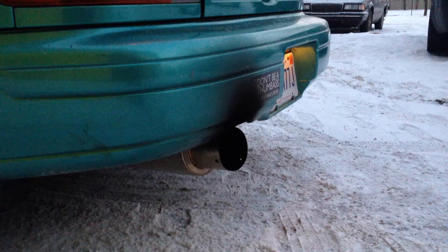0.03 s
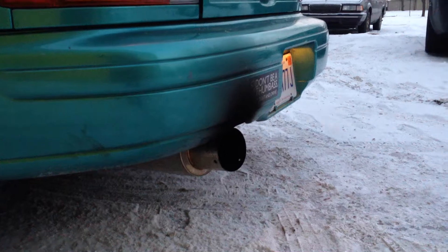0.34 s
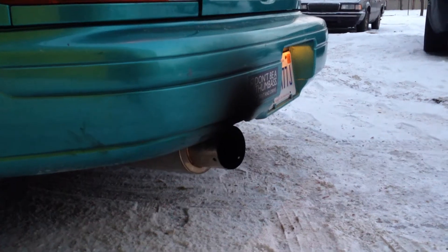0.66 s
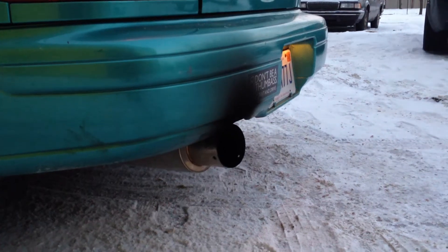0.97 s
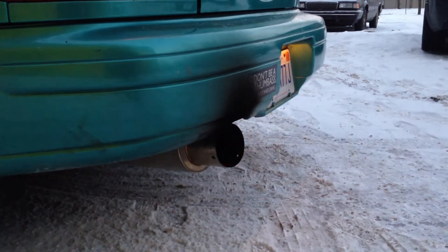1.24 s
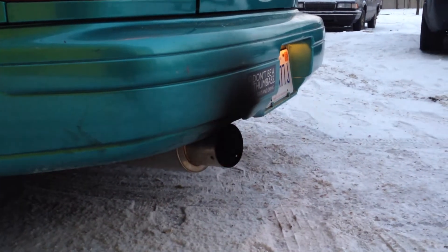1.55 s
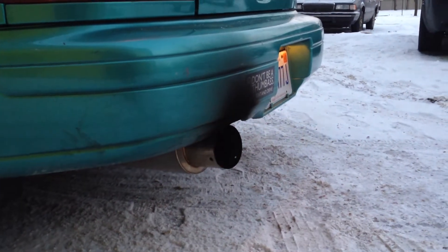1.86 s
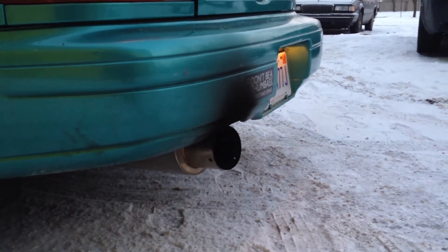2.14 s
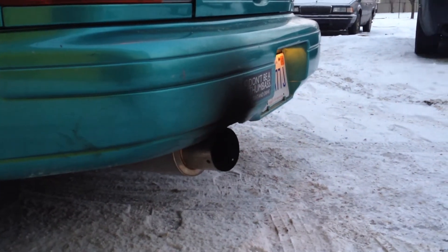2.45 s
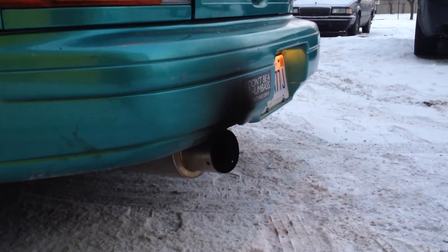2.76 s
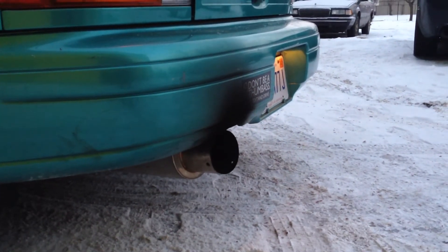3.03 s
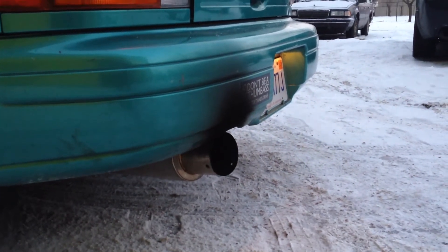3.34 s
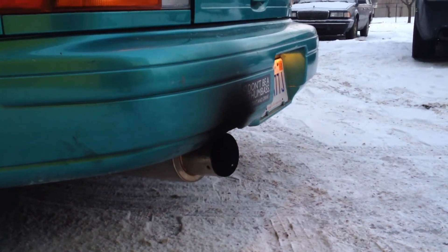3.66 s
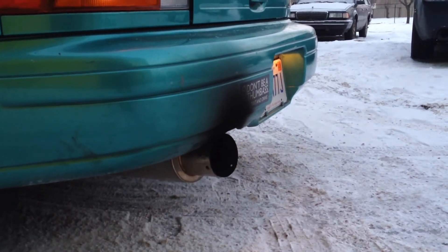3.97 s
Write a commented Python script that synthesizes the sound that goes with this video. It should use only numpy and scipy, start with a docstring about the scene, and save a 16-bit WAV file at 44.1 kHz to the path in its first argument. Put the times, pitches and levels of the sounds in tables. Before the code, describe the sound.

A car exhaust rumbles at a loping idle, with the microphone outside near the pipe. Early on it gives a single small pop and sputters briefly, then keeps thumping along, with a few deep thuds underneath.

```python
"""A four-cylinder car idles unevenly outdoors, heard close to its wide tailpipe.
Each firing is a pressure pulse: a low thump that reflects in the pipe, a knock in the pipe's resonant
modes, and a puff, rasp and hiss of turbulent gas. The engine drones behind; thin metal rings faintly.
One small backfire pops; the level ducks briefly, as under a limiter, and returns; sputters follow.
The loudest thumps just overload the microphone. A few deep thuds sound, as from an overloaded recorder."""
import sys
import numpy as np
from scipy import signal
from scipy.fft import rfft, irfft
from scipy.io import wavfile
from scipy.ndimage import uniform_filter1d

SR = 44100
rng = np.random.default_rng(int(sys.argv[2]) if len(sys.argv) > 2 else 0)


def unload_audio(sound):
    """Save the sound as a 16-bit wav file, at the path given as the first command line argument."""
    columns = np.transpose(np.atleast_2d(sound))
    # keep every value between -1 and 1, then stretch to whole-number steps
    steps = np.round(np.clip(columns, -1, 1) * 32767)
    wavfile.write(sys.argv[1], SR, steps.astype(np.int16))


N = 176400
TIME = np.arange(N) / SR


def from_db(db):
    """Amplitude ratio of a level in decibels."""
    return 10 ** (np.asarray(db) / 20)


def unit_rms(x):
    """Normalisation to unit mean power."""
    return x / np.sqrt(np.mean(x ** 2) + 1e-20)


def noise(spectrum):
    """Spectral shaping: white noise takes on a colour, at unit power."""
    hz, db = np.transpose(spectrum)
    bin_hz = np.maximum(np.arange(N // 2 + 1) * SR / N, 1)
    gain = from_db(np.interp(np.log(bin_hz), np.log(hz), db))
    low_cut = np.minimum(bin_hz / hz[0], 1) ** 2
    return unit_rms(irfft(rfft(rng.standard_normal(N)) * gain * low_cut, N))


def flutter(depth_db):
    """Turbulence: random amplitude modulation with a grain of about a millisecond."""
    eddies = unit_rms(uniform_filter1d(rng.standard_normal(N), size=50))
    return unit_rms(from_db(depth_db * eddies))


def resonator(x, hz, t60):
    """Damped oscillator: a unit impulse excites a decaying sine of height 1."""
    r, w = from_db(-60 / (t60 * SR)), 2 * np.pi * hz / SR
    return signal.lfilter([0, np.sin(w)], [1, -2 * r * np.cos(w), r * r], x + 1e-18)


def impulses(times, db):
    """Impulse train with the given times and levels."""
    samples = np.clip(np.asarray(times) * SR, 0, N).astype(int)
    return np.bincount(samples, from_db(db), N + 1)[:N]


def delayed(x, delay_s):
    """Propagation delay."""
    return np.interp(TIME - delay_s, TIME, x, left=0)


def envelope(x, attack_s, decay_s):
    """Convolution gives each impulse a quick rise and an exponential decay."""
    t = TIME[:SR // 5]
    shape = (1 - np.exp(-(t / attack_s) ** 2)) * np.exp(-t / decay_s)
    return signal.fftconvolve(x, shape / shape.max())[:N]


def wave_packet(x, hz, width_s):
    """Each impulse becomes a pressure oscillation that swells and dies around it."""
    t = np.arange(-(SR // 20), SR // 20 + 1) / SR
    return signal.fftconvolve(x, np.sin(2 * np.pi * hz * t) / np.cosh(t / width_s), "same")


# Crankshaft speed (time [s], speed [rpm])
CRANK_SPEED = [(0.1, 1144.8), (0.5, 1179.0), (1.0, 1162.2), (1.35, 1181.4), (1.8, 1227.3), (2.05, 1172.1),
               (2.3, 1179.2), (2.5, 1200.8), (2.9, 1210.6), (3.15, 1192.3), (3.4, 1170.0), (3.7, 1183.6),
               (3.9, 1220.2)]
def crank_cycles():
    """Phase is the integral of speed; a four-stroke cycle takes two turns."""
    rpm = np.interp(TIME, *np.transpose(CRANK_SPEED))
    cycles = np.cumsum(rpm) / (120 * SR)
    return cycles - np.interp(.1407, TIME, cycles)  # zero phase at 0.1407 s


# Spectrum of the running engine (frequency [Hz], relative level [dB])
DRONE_SPECTRUM = [(20, 8.5), (45, 17.5), (150, 35.5), (300, 17.5), (600, -12), (1000, -5), (2000, -6),
                  (2800, -16.5), (5500, -16), (6600, -21.5), (10000, -26.5), (15000, -38)]
def engine_drone():
    """Stationary broadband noise, strongest in the bass."""
    return from_db(-27) * noise(DRONE_SPECTRUM)


# Modes of thin metal (frequency [Hz], level [dB], reverberation time T60 [s])
METAL_MODES = [(3856, -60.5, .06), (4590, -73, .02), (5450, -64, .012), (8070, -80, .12), (8633, -81, .12),
               (9412, -81, .15)]
def metal_ringing(cycles):
    """Forced vibration: noise drives narrow modes, whose sound swells once a cycle."""
    modes = sum(from_db(db) * unit_rms(resonator(rng.standard_normal(N), hz, t60))
                for hz, db, t60 in METAL_MODES)
    phase = 2 * np.pi * (cycles - 280 / 720)  # loudest at 280 degrees
    return modes * from_db(5 * (np.cos(phase) - 1))


# The level ducks briefly after the pop, as under a limiter, and returns (time [s], level [dB])
LEVEL_DUCK = [(.14, -1.5), (.4, 1.5), (.92, 0.5), (.975, -7), (1.03, -6.5), (1.08, -4.5), (1.122, 0),
              (1.16, -1), (1.21, 0.5), (3.9, 0.5)]
# Cylinders, with relative levels (crank angle [deg], thump [dB], thump frequency [Hz], thump width [s],
# knock [dB], puff [dB], rasp [dB], hiss [dB])
CYLINDERS = [(11.4, -1.71, 145.06, 0.0057, -6.5, -5.5, 0.5, -1), (198.8, -15, 82.9, 0.007, 2, 2.5, -5, -2),
             (381.76, 1.03, 135.4, 0.0043, -4.5, 0, -4, -1.5),
             (586.94, -4, 134.5, 0.0058, -23, -18.5, -21.5, -19.5)]
def firings(cycles, jitter_s=.00012, gas_spread_db=2.8):
    """Quasi-periodic excitation: each cylinder's firing times and the levels of its sounds."""
    cylinders = []
    for angle, thump_db, hz, width_s, knock_db, puff_db, rasp_db, hiss_db in CYLINDERS:
        phases = np.arange(int(cycles[-1]) + 1) + angle / 720
        times = np.interp(phases[phases < cycles[-1]], cycles, TIME)
        times += jitter_s * rng.standard_normal(len(times))
        duck_db = np.interp(times, *np.transpose(LEVEL_DUCK))
        puff_scatter, jet_scatter = gas_spread_db * rng.uniform(-1, 1, (2, len(times)))
        cylinders.append(dict(
            times=times, hz=hz, width_s=width_s,
            thump=thump_db + duck_db,
            knock=knock_db + duck_db,
            puff=puff_db + duck_db + puff_scatter,
            rasp=rasp_db + duck_db / 2 + jet_scatter,
            hiss=hiss_db + (duck_db + jet_scatter) / 2))
    return cylinders


def excitation(cylinders, sound, lead_s):
    """Superposition of all cylinders' impulses for one sound, just ahead of each firing."""
    return sum(impulses(c["times"] - lead_s, c[sound]) for c in cylinders)


# Reflections in the exhaust (delay [s], signed amplitude [ratio])
REFLECTIONS = [(.00633, -.65), (.01396, .26), (.02892, -.72)]
def exhaust_thumps(cylinders):
    """Reflection in a duct: each pressure pulse returns as echoes, some inverted."""
    direct = sum(wave_packet(impulses(c["times"], c["thump"]), c["hz"], c["width_s"]) for c in cylinders)
    return direct + sum(share * delayed(direct, delay_s) for delay_s, share in REFLECTIONS)


# Spectrum of the throaty puff (frequency [Hz], relative level [dB])
PUFF_SPECTRUM = [(220, 15.5), (330, 2), (450, 4.5), (630, 1), (850, -10), (1100, -7.5), (2500, -36.5)]
def gas_puffs(cylinders):
    """Pulsating flow: a burst of low noise at each firing, and a weaker one as its echo."""
    pulses = excitation(cylinders, "puff", lead_s=.0047)
    pulses += from_db(-6) * delayed(pulses, .0135)
    return from_db(-34) * envelope(pulses, attack_s=.003, decay_s=.0082) * noise(PUFF_SPECTRUM)


# Spectrum of the rasp (frequency [Hz], relative level [dB])
RASP_SPECTRUM = [(500, -4.5), (850, 2.5), (1050, -6.5), (1250, 5.5), (1600, -8.5), (1900, 0), (2300, -11),
                 (2800, -23), (5000, -27.5), (15000, -50.5)]
def gas_rasp(cylinders):
    """Turbulent outflow radiates a burst of midrange noise at each firing."""
    flow = envelope(excitation(cylinders, "rasp", lead_s=.0047), attack_s=.0039, decay_s=.006)
    return from_db(-37.5) * flow * noise(RASP_SPECTRUM) * flutter(depth_db=.42)


# Modes of the pipe (frequency [Hz], relative level [dB], reverberation time T60 [s])
PIPE_MODES = [(186.4, -33, 0.39), (223.6, -21.5, .13), (316, -38, 0.27), (368.5, -35, .1),
              (578.3, -37, 0.11), (625, -40.5, 0.1), (1130, -49.5, 0.069)]
def pipe_knocks(cylinders, lead_s=.004087, spread_db=1):
    """Resonance: each firing excites the pipe's modes, which then decay freely."""
    knocks = np.zeros(N)
    for c in cylinders:
        for hz, mode_db, t60 in PIPE_MODES:
            db = c["knock"] + mode_db + spread_db * rng.uniform(-1, 1, len(c["times"]))
            knocks += resonator(-impulses(c["times"] - lead_s, db), hz, t60)
    return knocks


# Spectrum of the hiss (frequency [Hz], relative level [dB])
HISS_SPECTRUM = [(1500, -4.5), (2800, 2.5), (3400, 2.5), (4400, -0.5), (5500, 1.5), (6500, -6.5),
                 (8000, -7), (11000, -14), (15000, -28)]
def gas_hiss(cylinders):
    """Turbulence in the escaping gas adds grainy treble just after each rasp begins."""
    flow = envelope(excitation(cylinders, "hiss", lead_s=.001), attack_s=.0045, decay_s=.0084)
    return from_db(-50.5) * flow * noise(HISS_SPECTRUM) * flutter(depth_db=2.5)


def lope(cycles, angle_deg=614, width_deg=50, dip_db=-10.5):
    """Amplitude modulation: a gain that dips once a cycle makes the idle lope."""
    away_deg = ((cycles - angle_deg / 720 + .5) % 1 - .5) * 720
    return from_db(dip_db * np.exp(-(away_deg / width_deg) ** 2))


# Spectra of the backfire's flame and crack (frequency [Hz], relative level [dB])
FLAME_SPECTRUM = [(200, -6), (330, -3), (450, -3), (620, 3), (780, 0), (900, -14), (1500, -18), (2300, -18),
                  (4000, -34), (15000, -60)]
CRACK_SPECTRUM = [(900, 14), (2200, 3), (4500, 6), (7000, 2), (11000, -5.5), (15000, 1.5)]
def backfire(at_s=.9612, width_s=.0023):
    """Sudden combustion: a pressure pulse with a dull burst of flame and a bright crack."""
    boom = wave_packet(-impulses([at_s], db=[4]), hz=153, width_s=width_s)
    flame = envelope(impulses([at_s - width_s], db=[-7.5]), attack_s=.00033, decay_s=.0029)
    crack = envelope(impulses([at_s + .001], db=[-39]), attack_s=.0016, decay_s=.0098)
    return boom + flame * noise(FLAME_SPECTRUM) + crack * noise(CRACK_SPECTRUM)


# Deep overload thuds (time [s], level [dB])
THUDS = [(1.129, -15.5), (1.529, -27), (3.036, -15), (3.742, -15)]
def overload_thuds():
    """Low-frequency transients: slow swings in the deep bass, as from an overloaded recorder."""
    return wave_packet(impulses(*np.transpose(THUDS)), hz=53.4, width_s=.011)


# Sputters shortly after the pop (time [s], level [dB])
SPUTTERS = [(1.166, -28), (1.196, -28.5), (1.211, -34), (1.218, -29.5), (1.271, -34.5), (1.297, -35)]
# Spectrum of a sputter (frequency [Hz], relative level [dB])
SPUTTER_SPECTRUM = [(300, 10), (650, 2.5), (1100, 9.5), (1500, -9), (2100, -3.5), (2800, -14.5),
                    (5500, -26), (15000, -43)]
def gas_sputters():
    """Intermittent flow: abrupt spurts of gas radiate short bursts of noise."""
    flow = envelope(impulses(*np.transpose(SPUTTERS)), attack_s=.00033, decay_s=.0088)
    return flow * noise(SPUTTER_SPECTRUM)


def scene():
    """Superposition of all sources in one channel; the crank times the periodic ones."""
    cycles = crank_cycles()
    cylinders = firings(cycles)
    engine = engine_drone() + metal_ringing(cycles)
    rumble = (exhaust_thumps(cylinders) + pipe_knocks(cylinders)) * lope(cycles)
    gas = gas_puffs(cylinders) + gas_rasp(cylinders) + gas_hiss(cylinders)
    return (engine + rumble + gas + backfire() + overload_thuds() + gas_sputters())[None]


def record(dry, start_s=.12, overload=1.08, stopband_hz=16000):
    """After a brief silence, microphone saturation rounds the peaks and a low-pass cuts the top."""
    x = dry * np.clip((TIME - start_s) / .004, 0, 1)
    x = x / (1 + (x / overload) ** 8) ** (1 / 8)
    return signal.sosfilt(signal.cheby2(16, 70, stopband_hz, fs=SR, output="sos"), x)


dry = scene()
out = record(dry)
unload_audio(out)
```